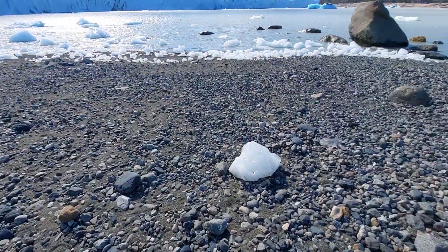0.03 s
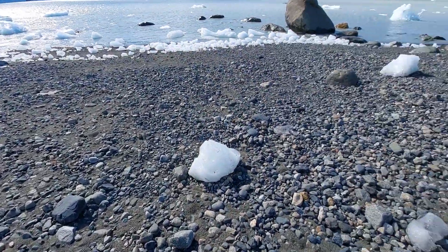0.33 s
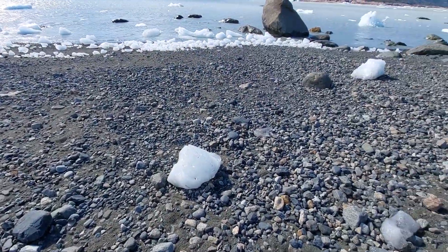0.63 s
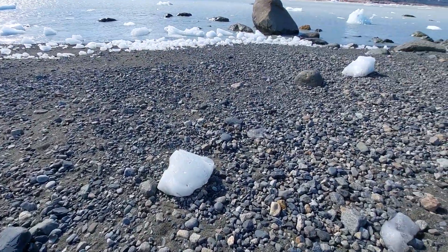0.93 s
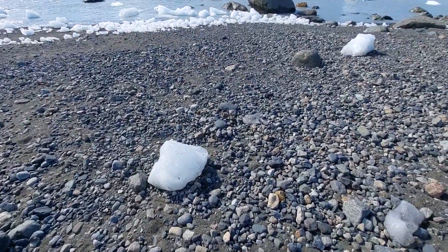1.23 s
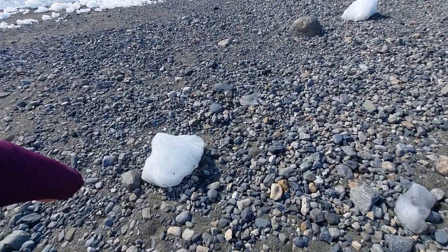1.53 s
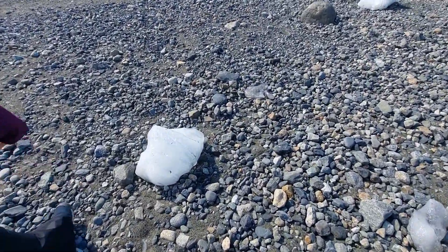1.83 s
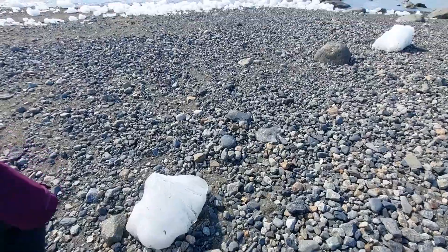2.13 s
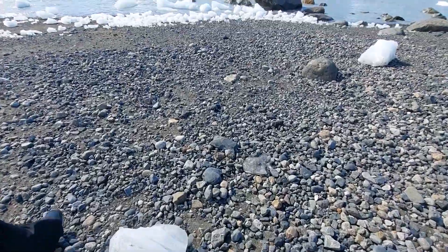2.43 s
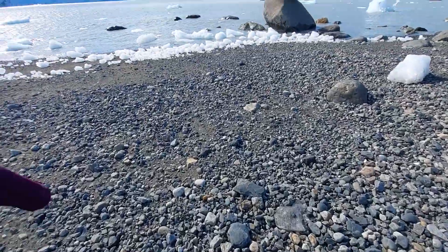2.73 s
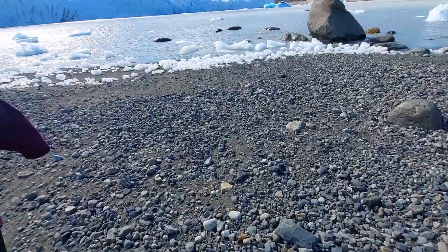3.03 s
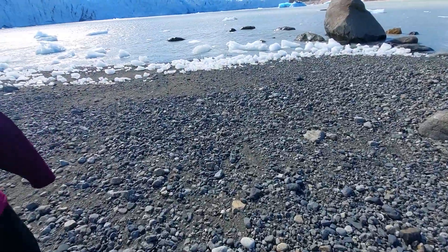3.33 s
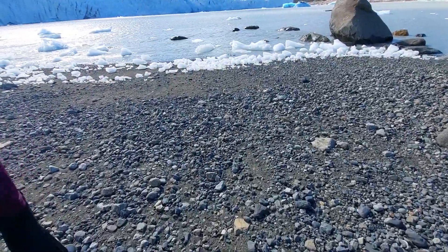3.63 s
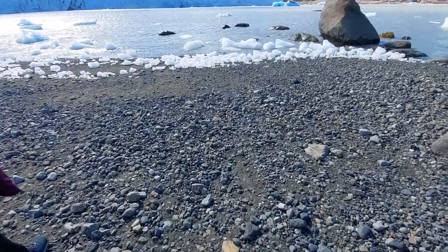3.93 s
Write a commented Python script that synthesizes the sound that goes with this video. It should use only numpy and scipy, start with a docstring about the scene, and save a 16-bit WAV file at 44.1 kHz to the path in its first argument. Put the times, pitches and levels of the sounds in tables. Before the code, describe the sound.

Boots shift and step irregularly on loose gravel outdoors, grinding grit and clicking larger pebbles together nearby. Wind builds after the first moments and keeps buffeting the microphone with a patchy low rumble.

```python
"""Slow, uneven footsteps on a pebble beach, close to a hand-held camera in gusty wind.
Each shift of weight grinds many small stones together, a sliding boot rasps on grit, and now and
then a larger pebble clacks; the stones sit a little right of centre. Wind flutters, spits and thumps
on each of the two microphone ports separately, over a faint hiss."""
import sys
import numpy as np
from scipy import signal
from scipy.fft import rfft, irfft
from scipy.io import wavfile
from scipy.ndimage import map_coordinates

SR = 44100
rng = np.random.default_rng(int(sys.argv[2]) if len(sys.argv) > 2 else 0)


def generate_wav(signal):
    """Clip the signal to [-1, 1] and save it as 16-bit WAV at the path in sys.argv[1]."""
    frames = np.transpose(np.atleast_2d(signal))
    scaled = np.clip(frames, -1, 1) * 32767
    pcm = np.round(scaled).astype(np.int16)
    wavfile.write(sys.argv[1], SR, pcm)


N = 176400
T = np.arange(N) / SR

# The tone of the gravel at the microphone. Each row: frequency in Hz, relative level in dB.
GRAVEL_SPECTRUM = [(300, -25), (900, -4.5), (1500, -4), (2200, -2), (3000, 4.5), (3700, -3.5), (5200, -1.5),
                   (6500, -3.5), (8300, -10.5), (11000, -5), (13000, -9), (16000, -18.5)]
GRAVEL_PAN_DB = -3  # left minus right
PORT_LAG_S, SCATTER_S = .00019, .00007  # the right port hears a stone later, give or take the scatter
CRACK_T60_S, TOP_HZ = .005, 15900


def undb(db):
    """Decibels to gain."""
    return 10 ** (np.asarray(db) / 20)


def unit(x):
    """Scale to an rms of 1."""
    return x / np.sqrt(np.mean(x ** 2) + 1e-20)


def curve(rows, column=1):
    """One column of a table joined by straight lines in time."""
    rows = np.array(rows)
    return np.interp(T, rows[:, 0], rows[:, column])


def colour(x, points, tilt_db=0):
    """Minimum-phase filter through (Hz, dB) points, with an extra slope per octave."""
    n = x.shape[-1]
    octave = np.log2(np.maximum(np.arange(n // 2 + 1) * SR / n, 1))
    hz, db = np.array(points).T
    gain = undb(np.interp(octave, np.log2(hz), db + tilt_db * np.log2(hz / hz[0])))
    cepstrum = irfft(np.log(gain), n)
    cepstrum[1:n // 2] *= 2
    cepstrum[n // 2 + 1:] = 0
    return irfft(rfft(x) * np.exp(rfft(cepstrum)), n)


def noise(points, shape=N):
    """Coloured noise of rms 1."""
    return unit(colour(rng.standard_normal(shape), points))


def drift(rate):
    """Smooth random drift of rms 1, through `rate` values a second."""
    values = rng.standard_normal(N // 10)
    return unit(map_coordinates(values, [T * rate], order=2, mode="mirror"))


def add(out, start, sound):
    """Mix a stereo sound in at a time in seconds."""
    i = max(int(start * SR), 0)
    part = sound[:, :max(N - i, 0)]
    out[:, i:i + part.shape[1]] += part


def sides(pan_db):
    """Left and right gains, the left higher by pan_db."""
    return undb(np.array([[pan_db], [-pan_db]]) / 2)


def fade(t, t60):
    """Exponential decay from time zero on."""
    return (t >= 0) * undb(-60 * np.maximum(t, 0) / t60)


def wind():
    """Eddies make each microphone port flutter and spit on its own, with a patchy rumble below."""
    # Wind strength right at the microphone. Each row: time in seconds, level in dB.
    gust_levels = [(0, -53.5), (.1, -57.5), (.29, -46.5), (.39, -43), (.47, -38.5), (.58, -39),
                   (.63, -50.5), (.73, -63.5), (.84, -39), (.89, -50.5), (.95, -34.5), (1.16, -39),
                   (1.23, -28.5), (1.32, -36.5), (1.41, -31), (1.5, -36.5), (1.66, -39), (1.79, -31.5),
                   (1.88, -41), (1.97, -34), (2.2, -39), (2.34, -40), (2.49, -33.5), (2.66, -31.5),
                   (2.73, -40), (3.0, -36.5), (3.13, -32), (3.24, -39.5), (3.38, -32), (3.46, -39),
                   (3.66, -34), (3.76, -45), (3.87, -48), (4, -38.5)]
    # The wind's brighter spitting. Each row: time in seconds, left and right level in dB.
    spit_levels = [(0, -58, -61), (.45, -52.5, -48), (.58, -41, -44), (.68, -56, -57), (.89, -53, -65),
                   (.94, -45, -63), (1.14, -43.5, -75), (1.22, -26, -34), (1.32, -36, -51),
                   (1.40, -34, -32.5), (1.52, -60, -57.5), (1.68, -46.5, -50), (1.79, -40, -37),
                   (2.35, -55, -55), (2.62, -38, -37.5), (2.73, -60, -56), (3.14, -50, -49),
                   (3.42, -47, -41.5), (3.52, -69, -64), (3.66, -33, -46.5), (3.82, -61.5, -60.5),
                   (4, -46, -45)]
    # Three tones of air in a port. Each row: frequency in Hz, relative level in dB.
    flutter_spectrum = [(60, -10), (150, -5.5), (230, -1), (320, 2), (430, -1), (560, -5.5), (750, -18),
                        (1000, -24.5), (1500, -49), (3000, -44.5)]
    spit_spectrum = [(200, -22.5), (500, 5), (750, 7), (1100, -1.5), (1600, -9), (2500, -9.5),
                     (6000, -38.5)]
    rumble_spectrum = [(25, -20.5), (45, -4), (62, -1), (85, -8.5), (125, -6), (190, -14.5), (300, -44),
                       (800, -62)]
    # The left port, then the right. Each row: flutter gain, rumble gain, rumble patchiness, all in dB.
    ports = [(3.1, -7, 5), (3.5, 6, 4)]
    usual_gust_db, eddy_depth_db = -31, 4.5
    spit_growth, rumble_growth = 2.2, .83  # dB per dB of eddy and of gust
    gust_db, out = curve(gust_levels) - usual_gust_db, []
    for side, (flutter_db, rumble_db, patchy_db) in enumerate(ports):
        eddy_db = eddy_depth_db * np.tanh(drift(rate=85))
        flutter = noise(flutter_spectrum) * unit(undb(eddy_db)) * undb(gust_db + flutter_db)
        spit = noise(spit_spectrum) * unit(undb(spit_growth * eddy_db))
        spit *= undb(curve(spit_levels, column=side + 1))
        rumble = noise(rumble_spectrum) * unit(undb(patchy_db * np.tanh(2 * drift(rate=16))))
        rumble *= undb(rumble_growth * gust_db + rumble_db)
        out.append((flutter + rumble) * undb(usual_gust_db) + spit)
    return np.array(out)


def hiss():
    """Faint background hiss that wavers slightly, a little stronger on the right."""
    # The tone of the hiss. Each row: frequency in Hz, relative level in dB.
    spectrum = [(100, 24), (700, -5), (1200, 6), (2200, 8.5), (3200, 4), (5500, 5), (8300, -6),
                (10000, -1.5), (12000, 1), (16000, -2.5)]
    # Its slow rise and fall. Each row: time in seconds, level in dB.
    levels = [(0, -54), (.6, -49), (.85, -53), (1.6, -50.5), (2.35, -48.5), (3.3, -47.5), (3.5, -56),
              (4, -47.5)]
    waver = undb(1.34 * drift(rate=7.21))
    return waver * undb(curve(levels)) * np.array([noise(spectrum), noise(spectrum)]) * sides(pan_db=-2)


def clacks():
    """Underfoot, a larger pebble cracks against another, rings briefly and rattles its neighbours."""
    # Pebble strikes. Each row: start in seconds, peak in dB before panning, pitch in Hz.
    strikes = [(0.223, -31.5, 2980), (0.918, -30.5, 1900), (1.018, -33, 1980), (1.144, -19, 1970),
               (1.185, -19.5, 2690), (1.196, -34, 2780), (1.267, -25.5, 2400), (1.287, -34, 2500),
               (1.3155, -32, 4980), (1.333, -24, 1870), (1.340, -25, 3280), (1.403, -40, 3000),
               (1.566, -30.5, 10300), (1.732, -22.5, 2480), (1.835, -22.5, 4250), (1.912, -26, 3270),
               (2.107, -22, 2870), (2.126, -26, 3350), (2.179, -21, 4530), (2.2154, -25.5, 1980),
               (2.224, -30, 3050), (2.534, -17, 6940), (2.594, -29, 3020), (2.7374, -14.5, 3780),
               (2.743, -17, 2090), (2.769, -31, 4500), (2.777, -24.5, 4280), (2.846, -25, 6500),
               (2.9, -10.5, 3260), (2.912, -13.5, 4720), (2.947, -21.5, 11100), (2.985, -18.5, 3720),
               (3.388, -25, 3930), (3.658, -23, 5900), (3.707, -20, 2940), (3.728, -33, 5500)]
    # A pebble's modes. Each row: multiple of its pitch, level in dB, t60 in seconds at a 2000 Hz pitch.
    modes = [(1, 0, 0.015), (1.13, -4.5, 0.02), (1.45, -2, 0.0091), (1.81, -13.5, 0.015), (2.1, -24, 0.033),
             (2.8, -27, 0.0041)]
    rattle_db, rattle_t60_s = -21, .05
    out, t = np.zeros((2, N)), T[:4096]
    age = t - np.array([[0], [PORT_LAG_S]])
    for start, db, hz in strikes:
        detunes = 1 + .04 * rng.standard_normal(len(modes))
        stretch = (2000 / hz) ** .5  # lower pebbles ring longer
        ring = sum(undb(mode_db) * np.sin(2 * np.pi * hz * ratio * detune * age) * fade(age, t60 * stretch)
                   for (ratio, mode_db, t60), detune in zip(modes, detunes) if hz * ratio < TOP_HZ)
        tilt_db = 6.3 * np.log2(hz / 3200)
        grit = unit(colour(rng.standard_normal(age.shape), GRAVEL_SPECTRUM, tilt_db))
        hit = ring + grit * (fade(age, CRACK_T60_S) + undb(rattle_db) * fade(age, rattle_t60_s))
        add(out, start, hit / np.abs(hit).max() * undb(db))
    return out * sides(GRAVEL_PAN_DB)


def grinding():
    """A stream of tiny stone contacts: each rings for a few cycles and reaches the left port first."""
    grains_per_s, spread_db, t60_cycles = 1800, 4.5, 7.8
    out, t = np.zeros((2, N)), T[:256]
    grains = rng.random((N // 8, 6))[:int(grains_per_s * N / SR)]
    for when, pitch, size, place, side, phase in grains:
        hz = 700 * (16000 / 700) ** (pitch ** .7)
        age = t - np.array([[0], [PORT_LAG_S + SCATTER_S * (2 * place - 1)]])
        ring = np.sin(2 * np.pi * (hz * age + phase)) * fade(age, t60_cycles / hz)
        strength = undb(-spread_db * np.log(.015 + size)) * hz ** .75
        add(out, when * N / SR, ring * strength * sides(6 * (2 * side - 1)))
    return unit(out)


def ticking():
    """Dry, sharp ticks as stones slip past one another: many faint, a few strong."""
    ticks_per_s, spread_db = 240, 4.5
    out, t = np.zeros((2, N)), T[:256]
    for _ in range(int(ticks_per_s * N / SR)):
        when, size, place = rng.random(3)
        strength = undb(-spread_db * np.log(.03 + size))
        left = rng.standard_normal(len(t)) * fade(t, t60=.0038) * strength
        right = np.roll(left, int((PORT_LAG_S + SCATTER_S * (2 * place - 1)) * SR))
        add(out, when * N / SR, np.array([left, right]))
    return unit(out)


def crunches():
    """Each press of a boot swells, grinds stones and sand, then settles; the boot reflects the sound."""
    # Presses into the gravel. Each row: start in seconds, seconds until it settles, level in dB,
    # brightness in dB per octave, pitch of the rubbed stones in Hz.
    presses = [(.247, 0.077, -38.5, -4, 1780), (.275, 0.05, -41.5, 1.5, 5800),
               (.355, 0.073, -51.5, 2, 2060), (.46, .13, -52, 2.5, 2100), (.929, 0.25, -50, -10, 1800),
               (1.183, 0.013, -33, -6, 3000), (1.21, 0.078, -43.5, -4.5, 2560),
               (1.325, 0.075, -44.5, -2.5, 2020), (1.42, 0.094, -54.5, -2.5, 2200),
               (1.78, 0.21, -47, -4, 4160), (2.07, 0.072, -40.5, -5, 2900), (2.153, 0.079, -45, -8.5, 3230),
               (2.37, 0.25, -47.5, 4.5, 6030), (2.526, 0.061, -37.5, -2, 6700),
               (2.703, 0.074, -39, 1, 4300), (2.79, 0.16, -40.5, -1, 3900), (2.94, 0.1, -45, 0, 4470),
               (3.127, 0.053, -43.5, 2.5, 3050), (3.195, 0.035, -38.5, -2, 3130), (3.26, .11, -44, 0, 4200),
               (3.63, 0.093, -42, 0, 4600), (3.68, 0.019, -35.5, 1.5, 2970),
               (3.741, 0.099, -53, -1.5, 5130), (3.88, 0.056, -44, 6.5, 2690)]
    tick_db, sand_db, resonance_db = 1.5, -9, -2
    swell_share, settle_s = .34, .017
    usual_echo_s, echo_gain = .000789, .57
    stream = grinding() + undb(tick_db) * ticking() + undb(sand_db) * rng.standard_normal((2, N))
    out, t = np.zeros((2, N)), T[:16384]
    for k, (start, length, db, tilt_db, hz) in enumerate(presses):
        contacts = np.roll(stream, -k * (N // len(presses)), axis=1)[:, :len(t)]
        stones = colour(contacts, GRAVEL_SPECTRUM, tilt_db)
        stones += undb(resonance_db) * signal.lfilter(*signal.iirpeak(hz, Q=3.5, fs=SR), stones)
        echo_samples = int(usual_echo_s * (.5 + rng.random()) * SR)
        stones += echo_gain * np.roll(stones, echo_samples, axis=1)
        swell = np.minimum(t / (swell_share * length), 1)
        weight = swell * np.exp(-np.maximum(t - length, 0) / settle_s)
        add(out, start, unit(stones * weight) * np.sqrt(np.mean(weight ** 2)) * undb(db))
    return out * sides(GRAVEL_PAN_DB)


def puffs(rows, rise_s, roughness):
    """Single blows of air on the microphone: a short, ragged swing of pressure, different at each port."""
    out, t = np.zeros((2, N)), T[:8192]
    envelope = t / rise_s * np.exp(1 - t / rise_s)
    for start, db, hz, pan_db in rows:
        swing = np.sin(2 * np.pi * (hz * t + rng.random((2, 1)) / 2))
        ragged = noise([(hz / 4, -8), (hz, 0), (hz * 2, -8), (hz * 8, -45), (hz * 20, -75)], swing.shape)
        pressure = (swing + roughness * ragged) / (1 + roughness)
        add(out, start, pressure * envelope * undb(db) * sides(pan_db))
    return out


def buffets():
    """A sharp buffet starts with a dry pop in the port, then swings for a few cycles."""
    # Buffets on the microphone. Each row: start in seconds, level in dB, pitch in Hz,
    # left minus right in dB.
    blows = [(.288, -22.5, 310, -1), (.432, -24.5, 274, -5), (.917, -29.5, 618, 13), (.938, -32.5, 670, 12),
             (.955, -22.5, 560, 3), (1.053, -22, 402, 10), (1.127, -16.5, 433, -1),
             (1.222, -18.5, 536, -11), (1.356, -24, 410, 3), (1.401, -27, 650, 15), (1.728, -19.5, 270, -1),
             (1.775, -21, 453, 15), (1.985, -20.5, 460, 1), (2.282, -17, 286, -1), (2.353, -20, 233, 5),
             (2.405, -20.5, 420, 5), (2.465, -20.5, 438, -2), (2.512, -19.5, 346, -7.5),
             (2.615, -25, 713, 9), (2.65, -24, 475, 13), (2.775, -17, 258, -1), (3.099, -18, 317, 5),
             (3.15, -13.5, 457, 5.5), (3.302, -19, 447, 1), (3.399, -15, 306, -1), (3.422, -27.5, 734, 7),
             (3.497, -20, 336, -9), (3.597, -20, 372, 3), (3.658, -27, 500, -2), (3.933, -24, 318, -7)]
    pop_gain = .24
    pops, t = np.zeros((2, N)), T[:2048]
    for start, db, hz, pan_db in blows:
        burst = rng.standard_normal((2, len(t))) * fade(t, t60=.0036)
        pop = colour(burst, [(hz / 2, -10), (hz, 0), (hz * 3, -15), (hz * 10, -42)])
        add(pops, start, pop_gain * pop / np.abs(pop).max() * undb(db) * sides(pan_db))
    return pops + puffs(blows, rise_s=.0025, roughness=.55)


def rasps():
    """A sliding boot rubs fine grit, which sings in one broad resonance."""
    # Slides of a boot. Each row: start in seconds, length in seconds, level in dB, pitch in Hz.
    slides = [(0.351, 0.091, -48.5, 2000), (1.269, .028, -52, 2620), (2.413, 0.14, -50, 2720),
              (3.882, 0.17, -51, 2570)]
    out, t = np.zeros((2, N)), T[:8192]
    for start, length, db, hz in slides:
        grit = rng.standard_normal((2, len(t)))
        rub = signal.lfilter(*signal.iirpeak(hz, Q=6.5, fs=SR), grit)
        stroke = np.sin(np.pi * np.minimum(t / length, 1)) ** .5
        add(out, start, unit(rub) * stroke * undb(db))
    return out * sides(GRAVEL_PAN_DB)


def thumps():
    """Large eddies land right on the microphone ports as deep thumps."""
    # The eddies. Each row: start in seconds, level in dB, pitch in Hz, left minus right in dB.
    eddies = [(.435, -21.5, 63, -7.5), (.52, -18.5, 60.6, -5), (1.205, -24.5, 68.4, -24),
              (1.395, -25, 64.4, -26), (1.455, -14, 52, -1), (1.92, -17, 56.3, 9), (2.495, -22, 72, -2),
              (3.122, -22.5, 140, -3), (3.198, -18, 59, 1)]
    return puffs(eddies, rise_s=.0099, roughness=.4)


def knock():
    """One big pebble is knocked hard and rings; little bass sounds beneath its ring."""
    # Its modes. Each row: frequency in Hz, relative level in dB, t60 in seconds.
    modes = [(2115, -7, 0.03), (2265, 1, 0.011), (3300, -13, 0.029), (3900, -12, 0.038), (4390, -3, 0.025),
             (5600, -11, 0.035), (7300, -20, 0.016)]
    start_s, level_db, lag_s, low_cut_hz = 2.1342, -9, .0001, 1500
    out, age = np.zeros((2, N)), T[:4096] - np.array([[0], [lag_s]])
    ring = sum(undb(db) * np.sin(2 * np.pi * hz * age) * fade(age, t60) for hz, db, t60 in modes)
    crack = .5 * noise(GRAVEL_SPECTRUM, age.shape) * fade(age, CRACK_T60_S)
    hit = signal.lfilter(*signal.butter(2, low_cut_hz, "highpass", fs=SR), ring + crack)
    add(out, start_s, hit / np.abs(hit).max() * undb(level_db))
    return out * sides(GRAVEL_PAN_DB)


def scene():
    """Boots on the beach below the camera, wind on its microphone, hiss behind."""
    steps = crunches() + rasps() + clacks() + knock()
    air = wind() + buffets() + thumps()
    return steps + air + hiss()


def record(dry):
    """The camera cuts the top of the treble."""
    return signal.sosfilt(signal.ellip(10, .2, 70, TOP_HZ, fs=SR, output="sos"), dry)


dry = scene()
out = record(dry)
generate_wav(out)
```